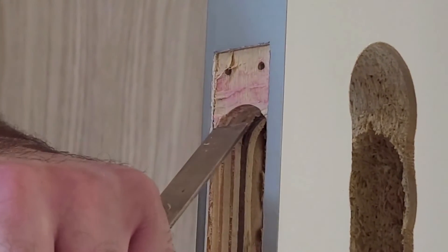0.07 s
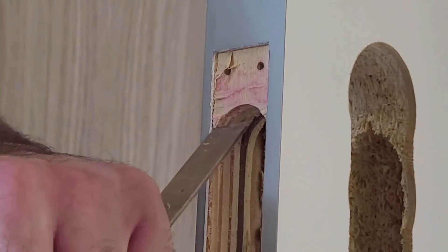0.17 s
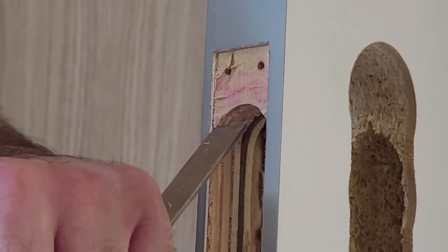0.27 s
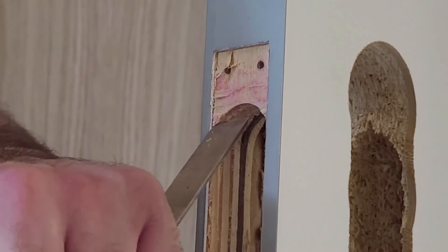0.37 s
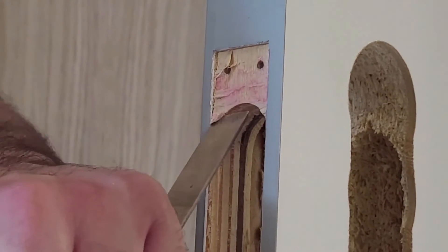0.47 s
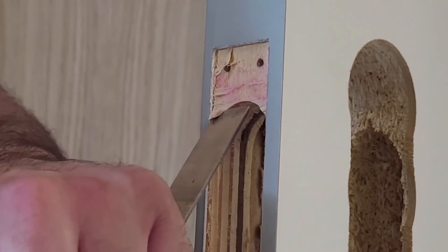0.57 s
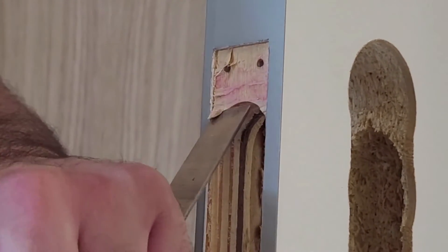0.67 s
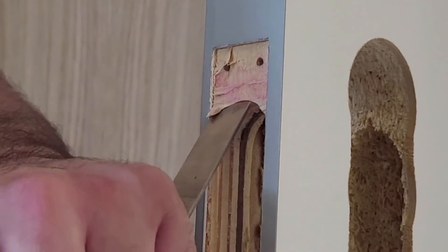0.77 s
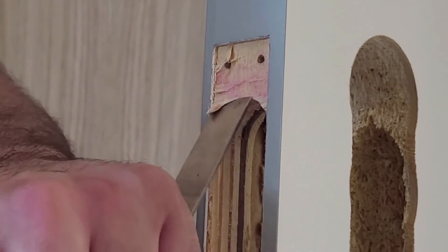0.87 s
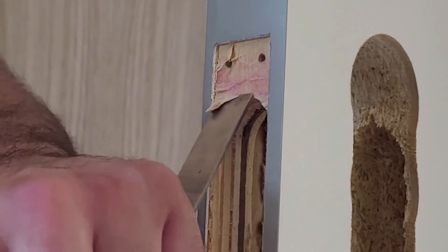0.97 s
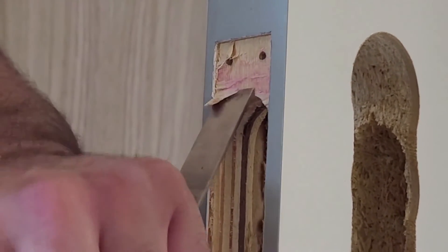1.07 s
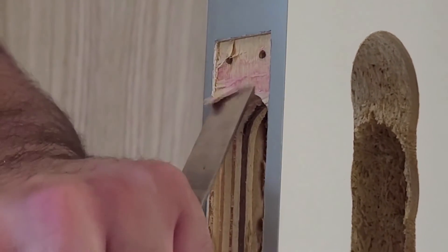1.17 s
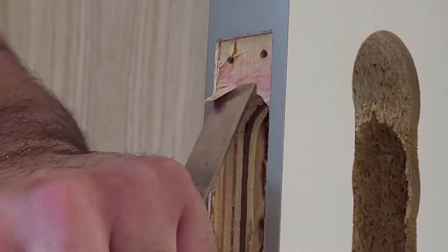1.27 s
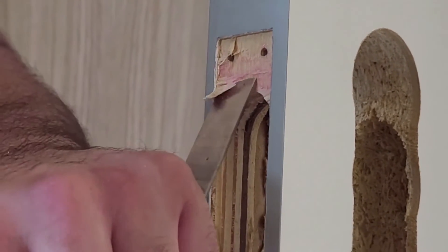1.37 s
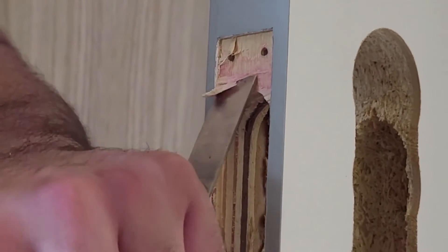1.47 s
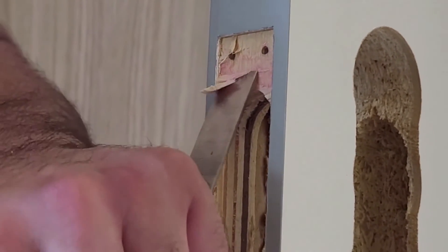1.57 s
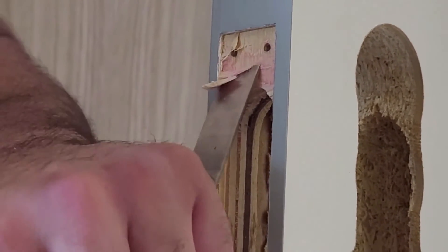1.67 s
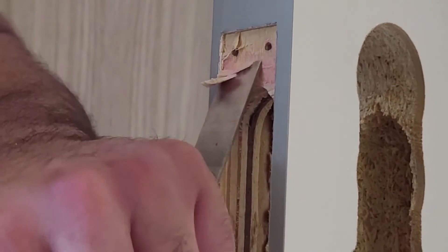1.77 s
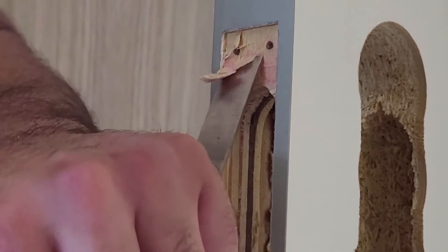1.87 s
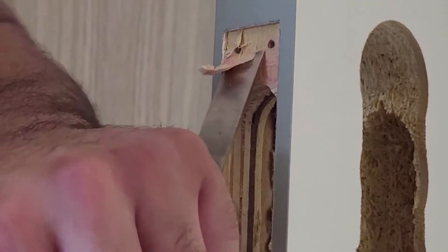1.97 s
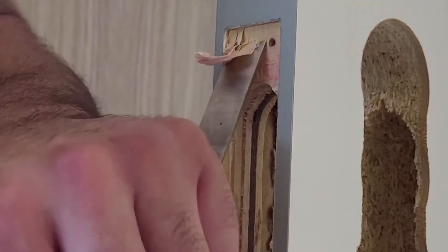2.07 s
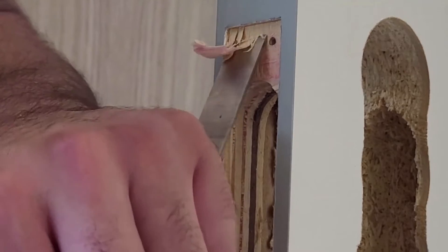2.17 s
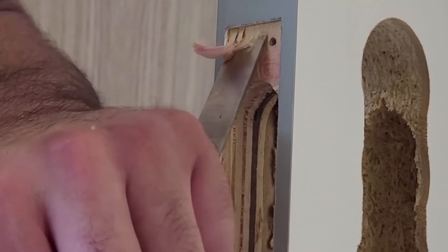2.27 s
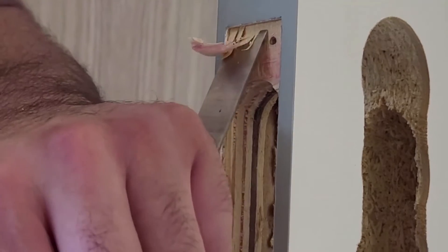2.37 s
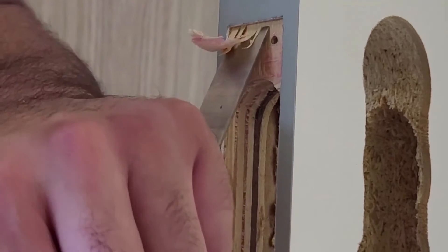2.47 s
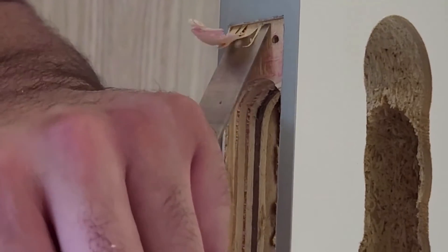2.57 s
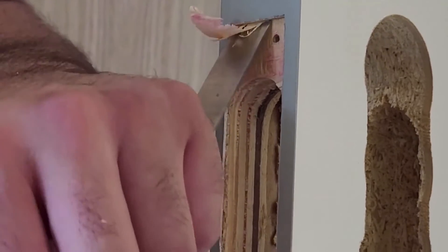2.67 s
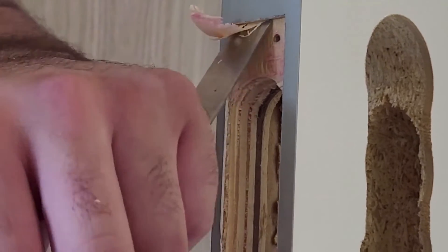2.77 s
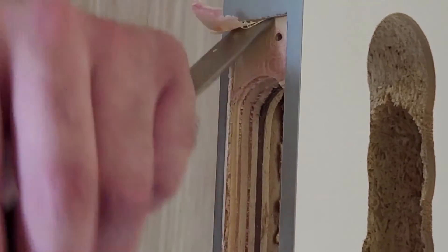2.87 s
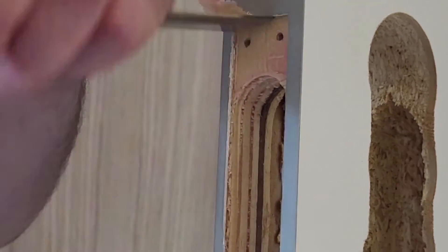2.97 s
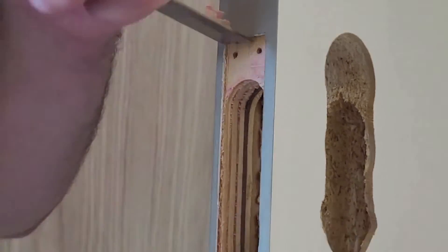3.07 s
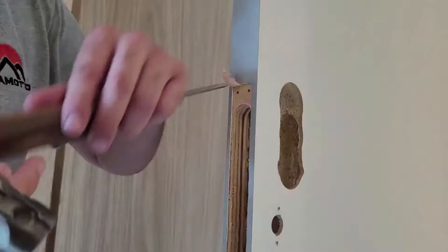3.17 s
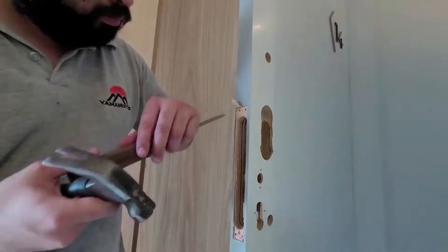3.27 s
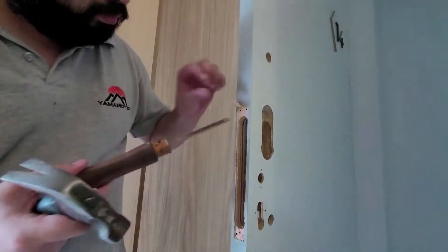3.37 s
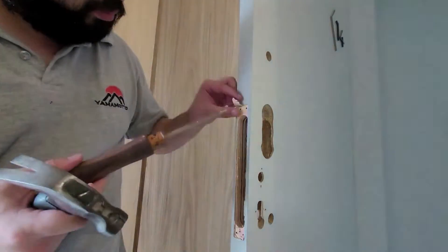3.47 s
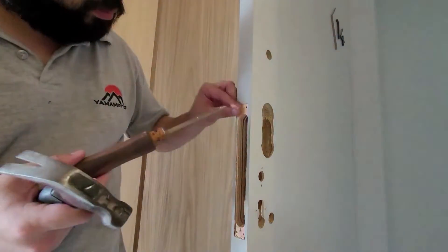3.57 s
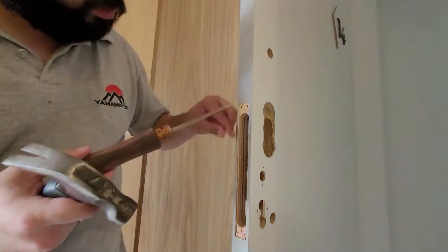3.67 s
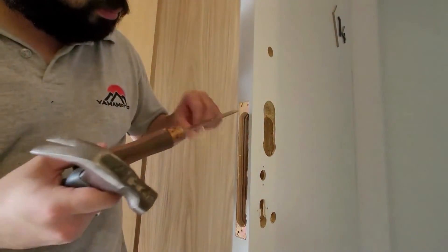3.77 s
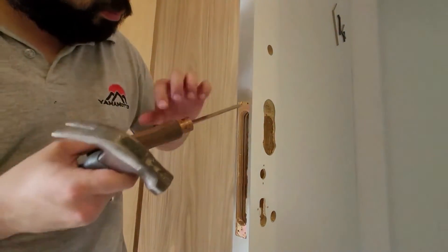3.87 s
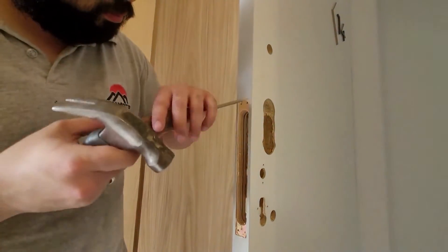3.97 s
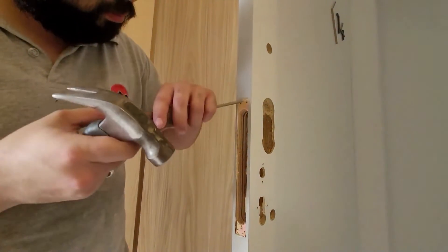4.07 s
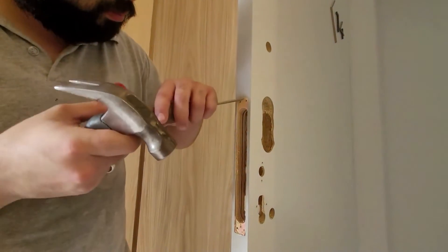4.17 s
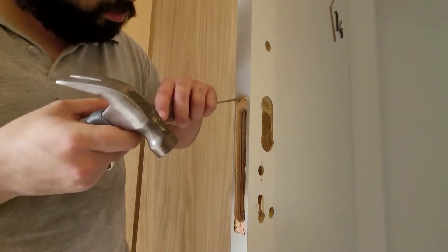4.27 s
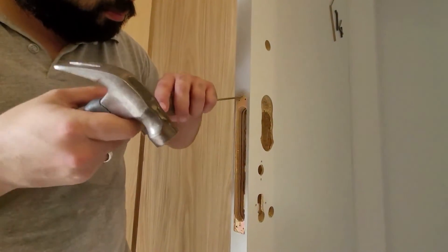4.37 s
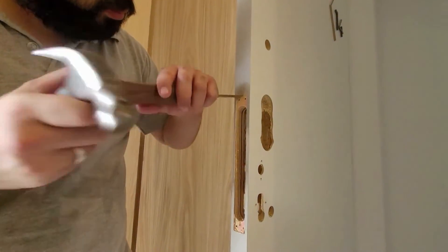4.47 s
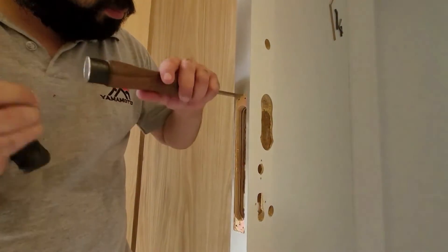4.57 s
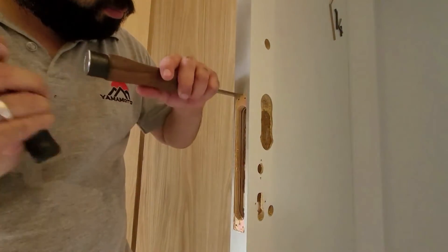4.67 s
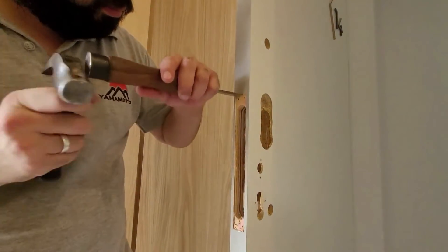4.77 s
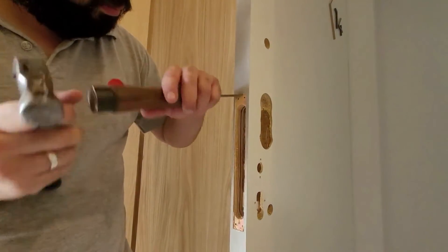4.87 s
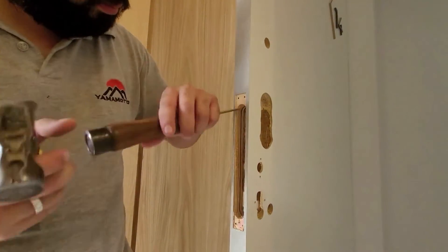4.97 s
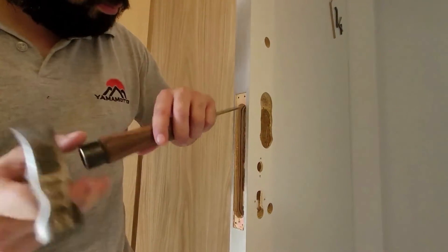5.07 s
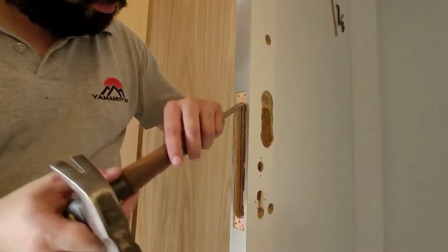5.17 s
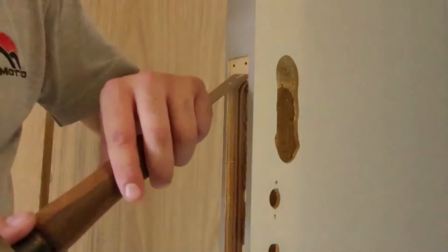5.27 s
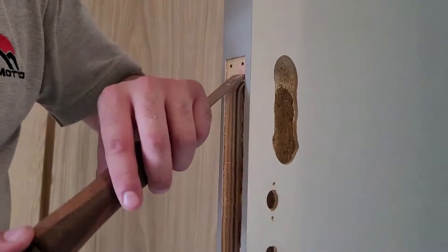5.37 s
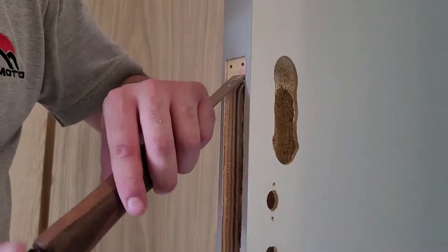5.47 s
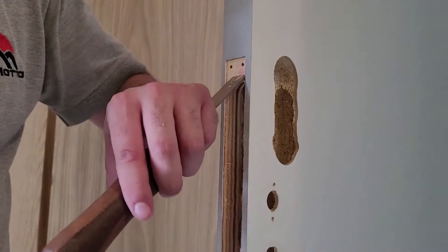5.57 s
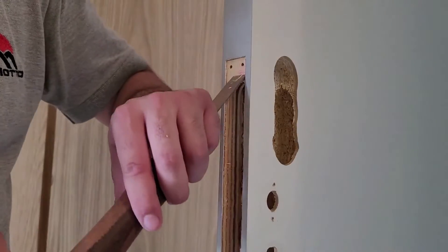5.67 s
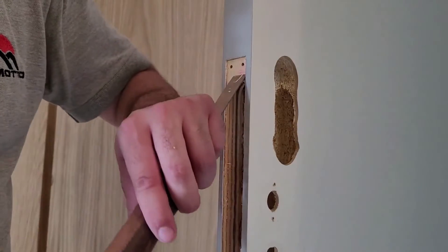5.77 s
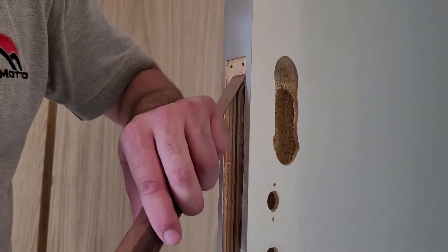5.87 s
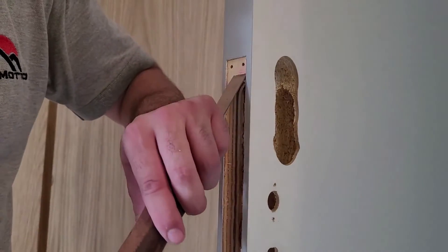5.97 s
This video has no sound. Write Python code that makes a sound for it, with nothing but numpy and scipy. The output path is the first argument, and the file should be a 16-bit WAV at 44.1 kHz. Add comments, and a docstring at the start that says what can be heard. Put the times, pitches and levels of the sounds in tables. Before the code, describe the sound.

Close up in a small hard room, a steel chisel shaves a wooden door edge in quick, regular, crackling scrapes, each with a bright rasp and a slight woody answer from the door. The strokes stop for quiet touches and dry ticks. A heavy hollow knock booms through the door, quiet handling follows, and a brief run of scrapes ends it. Soft hiss and hum lie behind.

```python
"""Chiselling a recess in a door edge

A chisel works in quick, even strokes, about nine a second, in a small hard room. Each stroke is a noise burst of
snapping fibres that rings steel blade and wooden handle through resonant filters, then, a moment later, the door.
In a pause come light touches and dry ticks; two strokes interrupt it, the second with a heavy knock of decaying
sines that booms the door. The strokes then resume. Behind lie faint tones and a hissing, humming room tone."""
import sys
import numpy as np
from scipy import signal
from scipy.fft import rfft, irfft, next_fast_len
from scipy.io import wavfile
from scipy.ndimage import uniform_filter1d, minimum_filter1d

SR = 44100
rng = np.random.default_rng(int(sys.argv[2]) if len(sys.argv) > 2 else 0)


def transcribe(u):
    """Save the signal u as a 16-bit wav file named by the first command-line argument.

    u: samples, shape (n,) or (channels, n), limited to [-1, 1]; the rate is SR.
    q: integer samples, one column per channel.
    """
    v = np.clip(np.atleast_2d(u).T, -1, 1)
    q = np.round(v * 32767).astype(np.int16)
    wavfile.write(sys.argv[1], SR, q)


N = 265658  # length of the scene in samples

# Resonances of the wooden handle.
# Each row: centre in Hz at neutral grip, width in Hz, relative level in dB.
HANDLE_MODES = [(1874, 450, -11), (2180, 270, -11.5), (2353, 380, -10.5), (2547, 130, -5.5),
                (2684, 380, -2.5), (3520, 1020, -8.5), (4440, 180, -10), (5230, 1180, -10)]

SIZE = 2 ** 14  # samples in one ring or snap
AGE = np.arange(SIZE) / SR  # s since its start
HZ = np.maximum(np.fft.rfftfreq(SIZE, 1 / SR), 1)
LEAD = .04  # s of run-up before the peak of each ring or snap


def undb(db):
    """Decibels to gain."""
    return 10 ** (np.asarray(db) / 20)


def add(out, s, x):
    """Mix x into out, starting at s seconds."""
    i = max(int(s * SR), 0)
    out[:, i:i + x.shape[-1]] += x[..., :N - i]


def level(x, db, span=.055):
    """Give x the energy of a sound that holds the level db for span seconds."""
    return x * undb(db) / np.sqrt(np.mean(x ** 2) * x.shape[-1] / (span * SR))


def colour(x, points, power=1):
    """Filter by a (Hz, dB) outline, its dB scaled by power."""
    hz, db = np.transpose(points)
    size = next_fast_len(x.shape[-1])
    f = np.maximum(np.fft.rfftfreq(size, 1 / SR), 1)
    gain = undb(power * np.interp(np.log(f), np.log(hz), db))
    return irfft(rfft(x, size) * gain, size)[..., :x.shape[-1]]


def chisel(splinter_db=3.5, splinter_spread_db=3, splinter_s=0.031, count=4):
    """At each stroke blade and handle answer at once, the heavy door a little later."""
    # Chisel strokes.
    # Each row: peak time in s, build-up in s, strength in dB, blade minus handle in dB.
    strokes = [(0.352, 0.0078, -32.5, 0.5), (0.466, 0.0022, -29.5, 7.5), (0.584, 0.0087, -30.5, 3.5),
               (0.686, 0.00061, -30, 7.5), (0.797, 0.0097, -29.5, 2.5), (0.889, 0.00075, -28, 3),
               (1.001, .003, -31, 1), (1.103, 0.00089, -28, 3), (1.214, 0.0066, -28.5, -1.5),
               (1.3263, 0.007, -29, -1), (1.428, 0.0011, -28, 0), (1.533, 0.0039, -29, 0),
               (1.63, 0.0034, -26.3, -0.5), (1.75, .01, -28.5, -0.5), (1.846, 0.00057, -26.5, -1.5),
               (1.955, 0.00032, -26, -2.5), (2.075, 0.0074, -26.5, 0.5), (2.19, 0.0056, -28, 1),
               (2.304, 0.00024, -25.5, -2), (2.417, 0.0016, -28.5, -2.5), (2.532, 0.0059, -30.5, -1),
               (2.63, 0.0011, -29, -2.5), (2.746, 0.0079, -29.5, -0.5), (4.654, .01, -34, -12.5),
               (4.765, 0.0071, -27, 2), (5.698, 0.0024, -29, -1), (5.768, 0.0055, -29.5, -12.5),
               (5.837, 0.0081, -29.5, -3), (5.952, 0.00096, -27, -3.5)]
    # Resonances of the door around the cut.
    # Each row: centre in Hz, width in Hz, relative level in dB.
    door_modes = [(134.3, 37, -5.5), (290, 42, -3.5), (445.4, 24, -0.5), (530, 200, -3.5), (607, 23, -8.5),
                  (709.3, 38, 4.5), (854, 31, -5), (987, 130, -7.5), (1165, 360, -8)]
    fall_s, fall_per_build = 0.0021, 0.11  # a stroke that bites slowly also lets go slowly
    drag_db, drag_fall_s = -11.5, 0.033  # drag level over the stroke; fall in s

    out = np.zeros((2, N))
    boom = body(door_modes, low_hz=77.7, high_hz=360)
    clack = body(door_modes, low_hz=466, high_hz=1900)
    drag = body(HANDLE_MODES, low_hz=3000, high_hz=8000)
    for s, build, db, steel_db in strokes:
        boom_db, clack_db, handle_db, blade_db, snap_db = stroke_levels(s, build, db, steel_db)
        start, fall = s - LEAD, fall_s + fall_per_build * build
        handle, blade, lead = tool_at(s)

        blade_ring = ring(struck(blade, build, focus=.05), build, fall, t60=0.2, swell=0.0011)
        add(out, start - .001, level(blade_ring, blade_db - 2.0))
        handle_ring = ring(struck(handle, build), build, fall, t60=0.29, swell=0.00063)
        add(out, start - .001, level(handle_ring, handle_db - 2.0))

        # the door follows: first its clack, then its boom
        door_clack = ring(struck(clack, build, focus=0.17), 1.24 * build, 0.95 * fall, t60=0.27, swell=0.00022)
        add(out, start + 0.003116, level(door_clack, clack_db))
        door_boom = ring(boom, .5 * build, 0.78 * fall, t60=0.4, swell=0.0014)
        add(out, start + 0.00702, level(door_boom, boom_db))

        # the shaving rubs on over the blade after each stroke
        shaving = ring(drag, build, drag_fall_s, t60=0.13, swell=0.0028)
        add(out, start, level(shaving, db + drag_db))

        tool = undb(handle_db + 5.5) * handle + undb(blade_db) * blade
        add(out, start, snap(tool, snap_db, length=0.0015 + 0.24 * build, lead=lead))
        # smaller splinters give way while the edge runs on
        for when, size in zip(rng.random(count), rng.standard_normal(count)):
            loud_db = max(handle_db, blade_db) + splinter_db + splinter_spread_db * size - 6 * when
            splinter = snap(tool, loud_db, length=0.00015, lead=lead, focus=0.34)
            add(out, start + .004 + splinter_s * when, splinter)
    return out


def stroke_levels(s, build, db, steel_db):
    """Share a stroke's strength among door boom, door clack, handle, blade and first snap (all dB)."""
    # How readily the door answers as the edge moves along it.
    # Each row: time in s, boom over the stroke in dB, clack over the handle share in dB.
    door_give = [(.35, -12, -9.5), (.88, -7.5, -4), (1.15, -11.5, -6.5), (1.549, -8, -6),
                 (2.08, -11, -13.5), (2.38, -14, -7), (2.75, -11.5, -7.5), (4.76, -4.5, -9),
                 (5.7, -8, -8.5)]
    snap_over_db, abrupt_db, abrupt_s = 9, 4, 0.0027  # first fracture over the stroke; extra for fast build-up

    times, boom_db, clack_db = np.transpose(door_give)
    handle_db, blade_db = db - steel_db / 2, db + steel_db / 2
    snap_db = db + snap_over_db + abrupt_db * np.exp(-build / abrupt_s)
    boom_db = db + np.interp(s, times, boom_db)
    clack_db = handle_db + np.interp(s, times, clack_db)
    return boom_db, clack_db, handle_db, blade_db, snap_db


def tool_at(s):
    """Responses of handle and blade, and the lead of the right ear, at s seconds."""
    # Resonances of the steel blade.
    # Each row: centre in Hz, width in Hz, relative level in dB.
    blade_modes = [(7160, 180, 2), (7850, 120, -19), (7770, 2900, -3.5), (8800, 70, -20), (9730, 660, 0.5),
                   (12260, 2860, -4), (13160, 550, 3), (13740, 600, 0.5), (15460, 760, -21)]
    # The handle rings a little higher or lower as the grip shifts.
    # Each row: time in s, pitch ratio.
    grip = [(.4, 1.065), (1.15, 0.94), (1.9, 1.025), (2.3, 0.97), (5.8, 1.04)]
    # The listener steps back and aside in the pause.
    # Each row: time in s, lead of the right ear in s, upper edge of the blade's ring in Hz.
    listener = [(2.9, .00009, 18000), (3.3, -.00009, 12000)]

    times, leads, edges_hz = np.transpose(listener)
    pitch = np.interp(s, *np.transpose(grip))
    gripped = [(hz * pitch, width, db) for hz, width, db in HANDLE_MODES]
    handle = body(gripped, low_hz=1480, high_hz=6720)
    blade = body(blade_modes, low_hz=5360, high_hz=np.interp(s, times, edges_hz))
    return handle, blade, np.interp(s, times, leads)


def body(modes, low_hz, high_hz):
    """Causal frequency response of a part with broad resonances, radiating between two edges."""
    power = sum(undb(db) ** 2 / (1 + (2 * (HZ - hz) / width) ** 2) for hz, width, db in modes)
    power = power / (1 + (low_hz / HZ) ** 6) / (1 + (HZ / high_hz) ** 8) + 1e-9
    # folding the cepstrum gives minimum phase: the part answers only after it is struck
    cepstrum = irfft(np.log(power))
    cepstrum[0] /= 2
    cepstrum[SIZE // 2:] = 0
    return np.exp(rfft(cepstrum))


def struck(response, build, focus=0.48, brisk_s=0.0042):
    """An abrupt stroke rings the strongest resonances of a part; a slow one scrapes it broadly."""
    return response * np.abs(response) ** (focus * np.exp(-build / brisk_s))


def ring(response, build, fall, t60, swell, grain_db=4):
    """Tearing fibres drive a part: uneven tiny snaps grow until LEAD seconds and fall; the room swells and fades."""
    late = AGE - LEAD
    snaps, sizes = rng.standard_normal((2, SIZE))
    envelope = np.exp(np.minimum(late / max(build, 1 / SR), -late / fall))
    force = snaps * undb(grain_db * sizes) * envelope
    room = diffuse(SIZE) * -np.expm1(-AGE / swell) * undb(-60 * AGE / t60)
    return irfft(rfft(force) * rfft(room) * response)


def diffuse(size):
    """Two-channel noise, most alike near 125 Hz and 8 kHz and nearly unrelated from 1.2 to 5 kHz."""
    # Unlikeness of the two ears in the room.
    # Each row: frequency in Hz, side minus mid in dB.
    width_outline = [(40, -4.5), (125, -18), (300, -9.5), (650, -9.5), (1200, 1), (2500, 0), (5000, 0),
                     (8000, -20), (14000, -5.5)]
    mid, side = rng.standard_normal((2, size))
    side = colour(side, width_outline)
    return np.array([mid + side, mid - side])


def snap(response, db, length, lead, window=0.0011, focus=1.0):
    """Direct sound of one short fracture, in which the strongest resonances stand out."""
    force = rng.standard_normal(SIZE) * np.exp(-((AGE - LEAD) / length) ** 2)
    heard = rfft(force) * response * np.abs(response) ** focus
    left = heard * np.exp(-2j * np.pi * HZ * lead)  # late by the right ear's lead
    x = irfft([left, heard])
    # db is the loudest short-window level in the right ear
    loudest = np.sqrt(uniform_filter1d(x[1] ** 2, int(window * SR)).max())
    return x * undb(db) / loudest


def touches():
    """The tool is set anew: soft noise swells ring it on the wood, short fractures make ticks and cracks."""
    # Light touches of the tool on the wood.
    # Each row: peak time in s, build-up in s, handle level in dB.
    soft_touches = [(0.047, 0.0094, -52.5), (3.192, 0.036, -51.5), (3.476, 0.008, -42), (3.57, .017, -59),
                    (4.212, 0.0038, -43), (4.277, 0.0071, -44.5), (4.952, 0.014, -49.5),
                    (5.354, 0.016, -64), (5.54, 0.012, -51), (5.659, 0.02, -52.5)]
    # Dry ticks of the tool and cracks of splinters.
    # Each row: peak time in s, length in s, level in dB, steel over handle response in dB.
    dry_ticks = [(0.684, 0.0014, -14.5, 0), (1.102, 0.0011, -9, -6.5), (3.235, 0.015, -42, -42),
                 (4.125, 0.00048, -41, 1), (4.21, .004, -32.5, -27), (4.954, 0.0031, -33, -20),
                 (5.767, 0.0014, -11.5, -10.5)]
    whisper_db = -63.5  # the blade whispers alike at every touch

    out = np.zeros((2, N))
    for s, build, handle_db in soft_touches:
        handle, blade, _ = tool_at(s)
        wood = ring(handle, build, fall=0.002, t60=0.21, swell=0.00025)
        add(out, s - LEAD, level(wood, handle_db))
        steel = ring(blade, build, fall=.0021, t60=0.22, swell=.001)
        add(out, s - LEAD, level(steel, whisper_db))
    for s, length, db, steel_db in dry_ticks:
        handle, blade, lead = tool_at(s)
        tool = handle + undb(steel_db) * blade
        add(out, s - LEAD, snap(tool, db, length, lead=lead, focus=0.93))
    return out


def knocks(detune=0.012, thud_hz=58, thud_t60=.08):
    """The leaf booms in its bending modes, as decaying sines, and thuds against its hinges."""
    # Knocks that set the whole door leaf swinging.
    # Each row: start in s, boom level in dB, thud level in dB.
    leaf_knocks = [(0.039, -38, -71), (.19, -40, -69), (0.249, -49, -68), (0.372, -44.5, -62),
                   (1.43, -48, -52), (1.751, -44.5, -44), (2.08, -34.5, -49), (4.761, -25.5, -37.5),
                   (5.841, -38, -56)]
    # Slow bending modes of the door leaf, detuned a little at each knock.
    # Each row: nominal pitch in Hz, relative level in dB, time to fall 60 dB in s.
    leaf_modes = [(88, -10.5, 0.098), (136.4, -15.5, .2), (218.3, -8, 0.24), (261.2, -1, 0.27),
                  (297, -2, 0.28), (503, -17, 0.32), (603, -10, 0.15), (1014, -6.5, 0.068)]

    out = np.zeros((2, N))
    for s, boom_db, thud_db in leaf_knocks:
        tuning = 1 + detune * rng.standard_normal(len(leaf_modes))
        boom = np.zeros(SIZE)
        for (hz, db, t60), ratio in zip(leaf_modes, tuning):
            boom += undb(db - 60 * AGE / t60) * np.sin(2 * np.pi * hz * ratio * AGE)
        boom *= -np.expm1(-AGE / 0.0052)  # soft onset
        thud = undb(-60 * AGE / thud_t60) * np.sin(2 * np.pi * thud_hz * AGE)
        add(out, s, level(boom, boom_db) + level(thud, thud_db))
    return out


def tones():
    """Faint sine tones, randomly wavering in pitch, that swell and sink."""
    # Short tones in the background.
    # Each row: start in s, length in s, start pitch in Hz, end pitch in Hz, level at the crest of the swell in dB.
    faint_tones = [(3.16, 0.081, 690, 690, -54), (3.3, 0.091, 580, 546, -46.5),
                   (5.13, 0.203, 228, 155, -55), (5.55, 0.07, 562, 550, -50.5)]
    out = np.zeros((2, N))
    for s, length, start_hz, end_hz, db in faint_tones:
        size = int(length * SR)
        # a new random pitch target every 10 ms
        waver = .035 * np.interp(np.arange(size) / SR, np.arange(100) / 100, rng.standard_normal(100))
        hz = np.linspace(start_hz, end_hz, size) * (1 + waver)
        tone = np.sin(2 * np.pi * np.cumsum(hz) / SR)
        add(out, s, np.sqrt(2) * undb(db) * np.hanning(size) * tone)
    return out


def room_tone(hum_hz=121, hum_over_low_db=-10, split_hz=1500):
    """Steady rumble and hiss from coloured noise, with a low sine hum."""
    # Spectral outline of the air noise.
    # Each row: frequency in Hz, relative density in dB per Hz.
    air_outline = [(18, -41), (30, -3), (86, -5.5), (118, -2.5), (239, -2), (384, -7), (512, -14),
                   (632, -12.5), (1040, -11.5), (1670, -18.5), (2060, -18), (4530, -16.5), (7670, -30.5),
                   (10800, -25), (16000, -36)]
    # Resonances that colour the room tone.
    # Each row: centre in Hz, width in Hz, lift in dB.
    air_peaks = [(525, 57, 9.5), (1023, 44, 9), (2076, 360, 8.5), (2710, 390, 8.5), (4650, 480, 3.5),
                 (13400, 4000, 4.5)]
    low_db, high_db = -48, -53  # room tone below and above the split

    t = np.arange(N) / SR
    f = np.fft.rfftfreq(N, 1 / SR)
    lift_db = sum(db / (1 + (2 * (f - hz) / width) ** 2) for hz, width, db in air_peaks)
    air = rfft(colour(diffuse(N), air_outline)) * undb(lift_db)
    below = 1 / (1 + (f / split_hz) ** 6)
    low = level(irfft(air * below, N), 0, N / SR)
    high = level(irfft(air * (1 - below), N), 0, N / SR)
    hum = undb(hum_over_low_db) * np.sqrt(2) * np.sin(2 * np.pi * hum_hz * t)
    return (low + hum) * undb(low_db) + high * undb(high_db)


def ducking(work):
    """Gain of the room tone: it drops under loud work, holds, and recovers at a steady rate."""
    above_db, depth_db = -31, 8  # threshold; deepest drop
    hold_s, recover_db_per_s = 0.38, 24

    power = np.abs(uniform_filter1d(np.mean(work ** 2, axis=0), SR // 40))  # 25 ms mean
    excess_db = np.maximum(10 * np.log10(power + 1e-12) - above_db, 0)
    half = int(hold_s * SR / 2)
    # running maximum over the hold time just past
    held_db = -minimum_filter1d(-excess_db, 2 * half + 1, origin=half, mode="constant")
    ramp_db = recover_db_per_s * np.arange(N) / SR
    drop_db = np.maximum.accumulate(held_db + ramp_db) - ramp_db  # can fall no faster than the ramp
    return undb(-np.minimum(drop_db, depth_db))


def scene(aim=0.61):
    """The work on the door, leaning left or right by pitch, over faint tones and the room tone."""
    # Direction in which the work radiates; aim scales it up on the left and down on the right.
    # Each row: frequency in Hz, lean to the left in dB before that scaling.
    lean = [(50, 10.5), (130, 1.5), (400, 1.5), (1200, 1), (2400, -7.5), (4400, -4), (8000, 0), (14000, 3)]
    left, right = chisel() + touches() + knocks()
    work = np.array([colour(left, lean, power=aim), colour(right, lean, power=-aim)])
    return work + tones() + room_tone() * ducking(work)


def record(dry):
    """Soft saturation rounds the highest peaks and a steep low-pass cuts the top."""
    top_hz = 15800
    rounded = .8 * np.tanh(dry / .8)
    low_pass = signal.ellip(10, .2, 70, top_hz, fs=SR, output="sos")
    return signal.sosfilt(low_pass, rounded)


dry = scene()
out = record(dry)
transcribe(out)
```